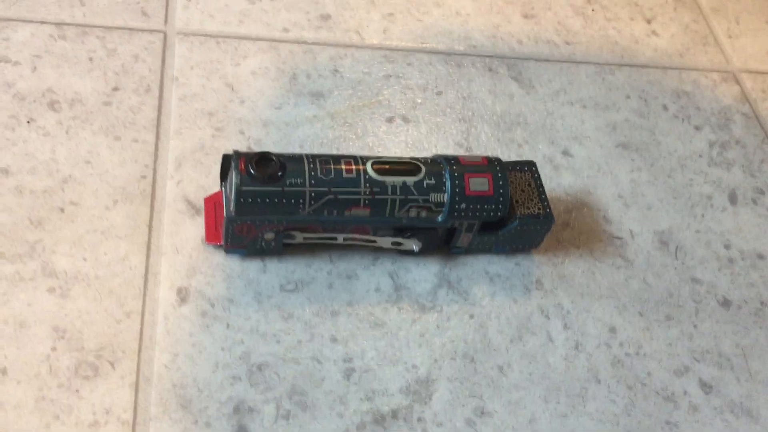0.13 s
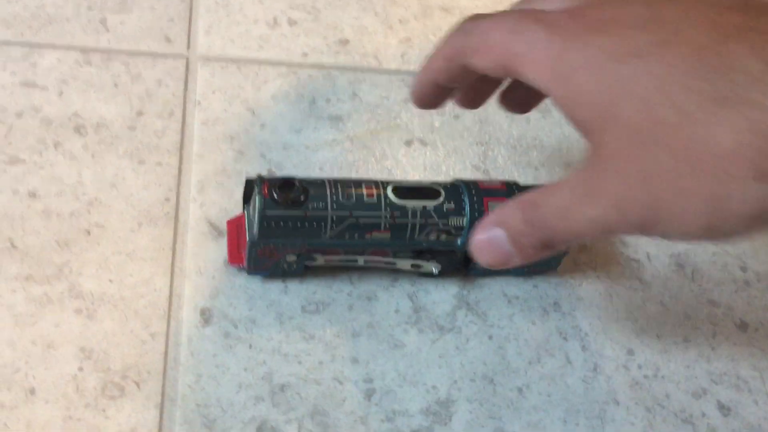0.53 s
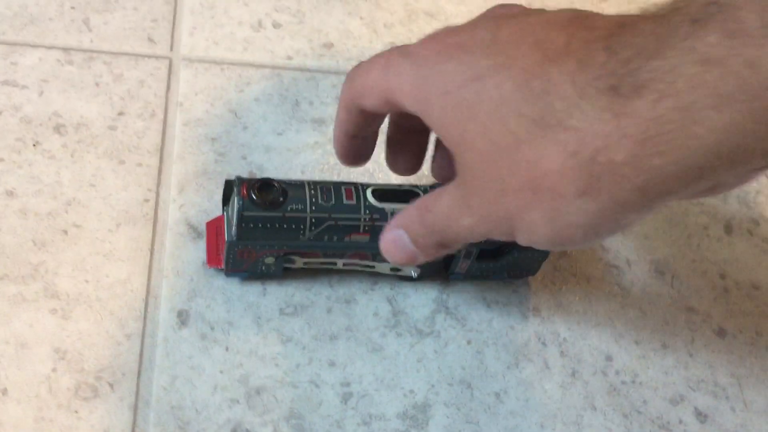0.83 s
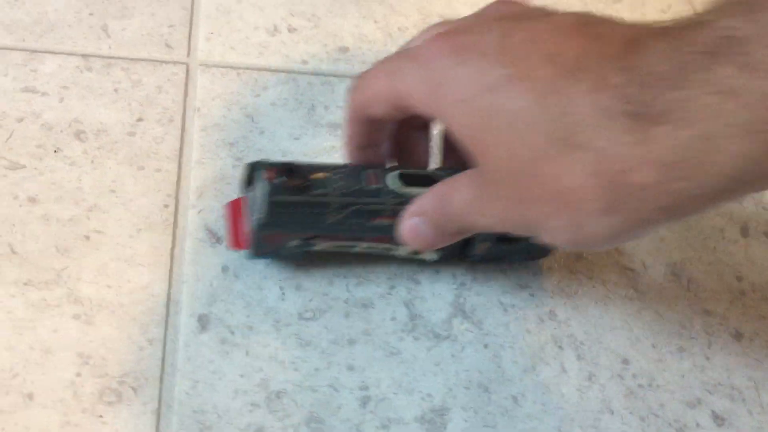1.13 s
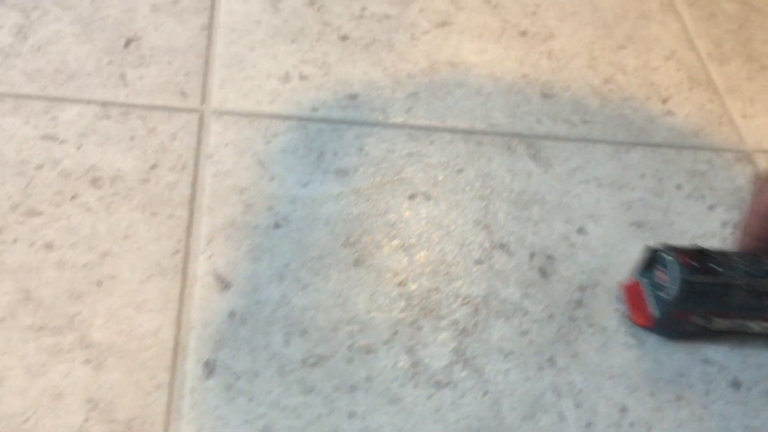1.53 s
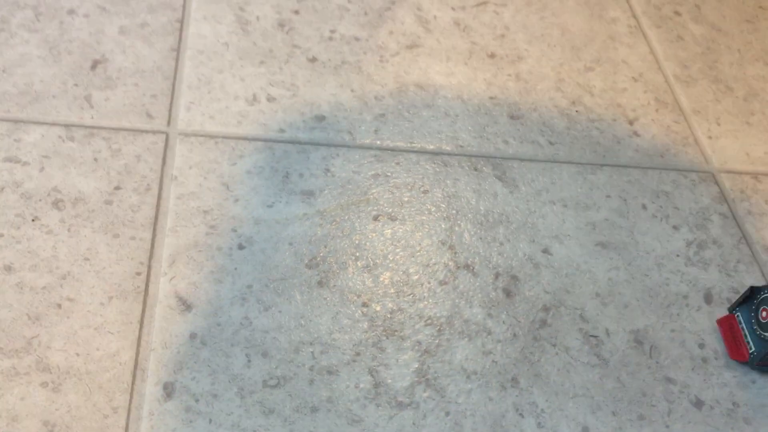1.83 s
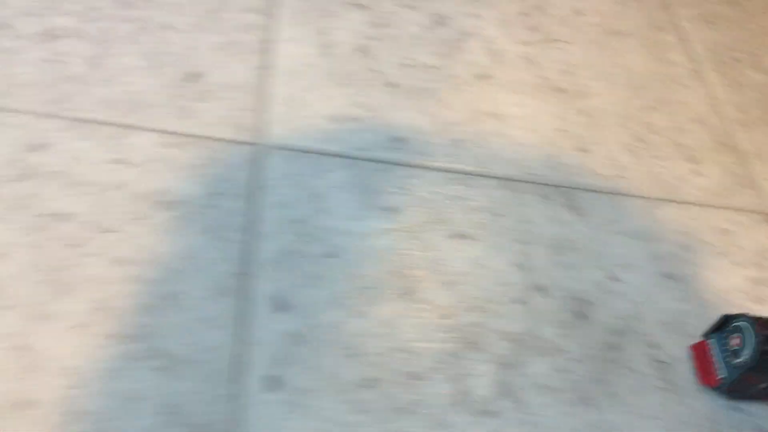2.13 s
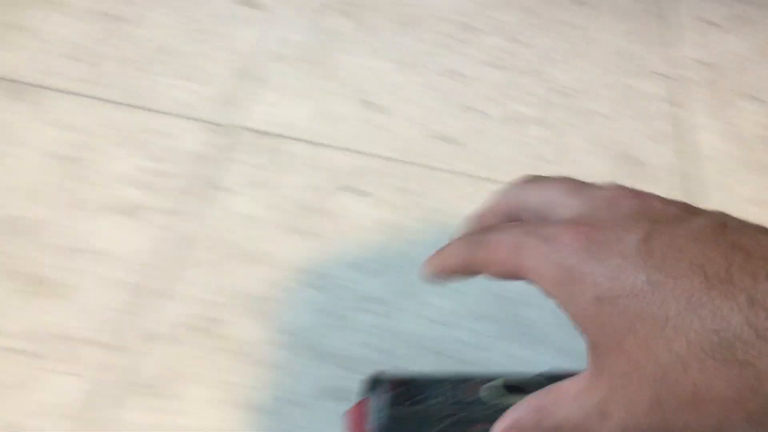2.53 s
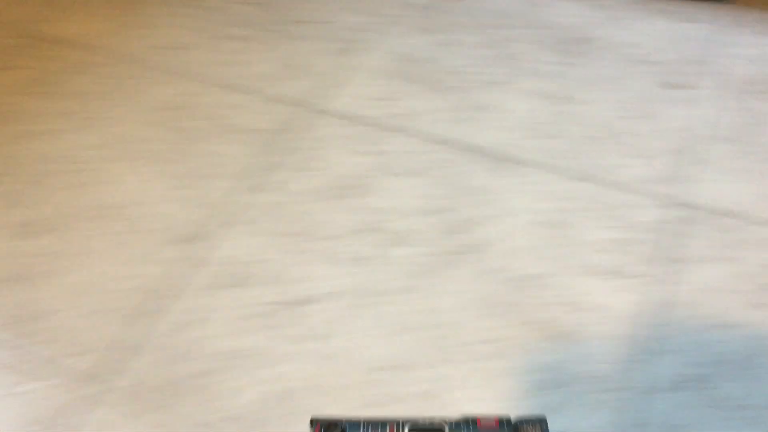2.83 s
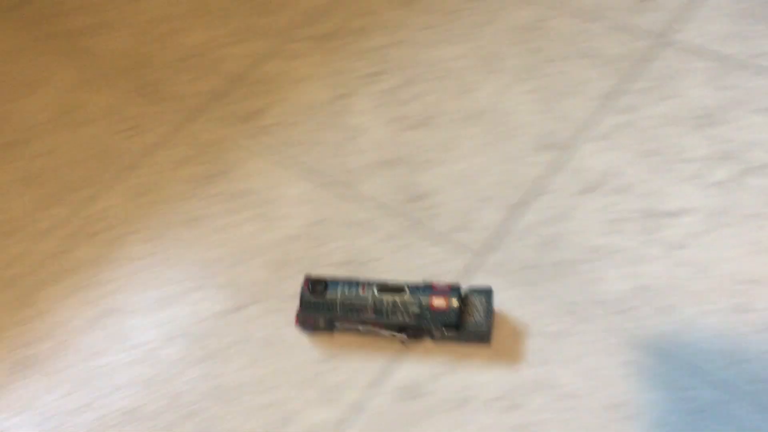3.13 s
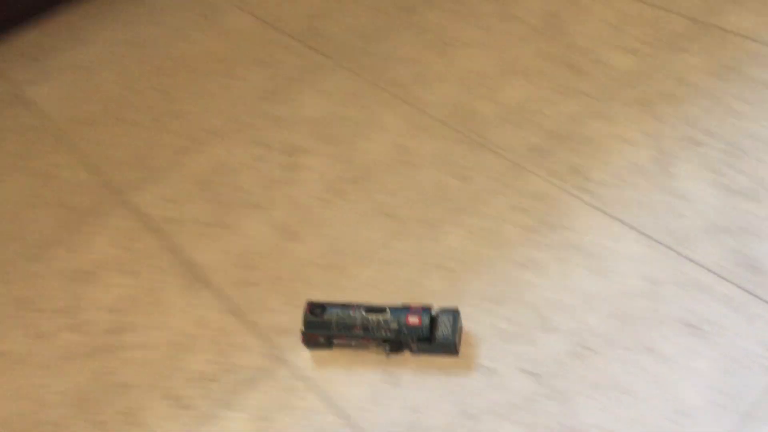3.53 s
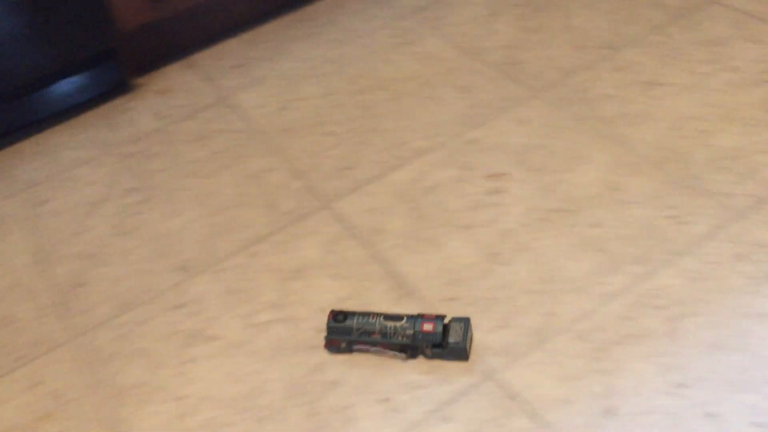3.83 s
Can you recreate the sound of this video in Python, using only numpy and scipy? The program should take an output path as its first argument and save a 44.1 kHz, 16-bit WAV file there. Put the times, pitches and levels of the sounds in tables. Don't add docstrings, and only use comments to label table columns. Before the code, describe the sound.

After a quiet second of low appliance drone, loose tin clicks and clatters under a hand; a hard push starts a harsh metallic gear whir that runs off along an indoor tiled floor, recorded close.

```python
import sys
import numpy as np
from scipy import signal
from scipy.io import wavfile
from scipy.ndimage import uniform_filter1d

SR = 44100
rng = np.random.default_rng(int(sys.argv[2]) if len(sys.argv) > 2 else 0)


def output_pcm(signal):
    pcm = np.clip(np.atleast_2d(signal).T, -1, 1) * 32767
    wavfile.write(sys.argv[1], SR, np.round(pcm).astype(np.int16))


def volts_from_decibels(level):
    exponent = np.asarray(level, float) / 20
    return 10 ** exponent


N = 176400
T = np.arange(N) / SR

# time in seconds, level in dB.
DRIVE = [(2.13, -54), (2.165, -37), (2.21, -30), (2.26, -25), (2.33, -21.5), (2.43, -21), (2.51, -22),
         (2.55, -22), (2.68, -23.5), (2.95, -24), (3.2, -25), (3.5, -26.5), (3.75, -27.5), (4.0, -28)]
# frequency in Hz, density in dB per Hz.
GRIND_HELD = [(500, -19), (900, -18), (1300, 4), (3300, 2.5), (4900, 0), (6200, 0.5), (8800, 4),
              (14000, -5)]
GRIND_FREE = [(500, 0), (800, -36), (1510, 6.5), (3900, 1), (4700, 1.5), (5900, 2.5), (9000, -1),
              (15400, -4.5)]
GRIND_FAR = [(500, 0), (800, -43), (1510, 5.5), (3900, -0.5), (4700, -6.5), (5900, 0), (9000, -2.5),
             (15400, -7)]
# frequency in Hz, width in
# Hz, levels held, just free and far off in dB.
TOY_MODES = [(950, 110, -13, -14, -16), (1425, 110, 5, 8, 3), (1530, 100, 6, 7, 7), (1740, 70, -3, 1, 3),
             (2130, 90, 1, 5, 6), (2440, 80, -7, -6, -2), (2750, 100, -2, 1, 2), (2990, 80, -8, -9, -4),
             (3200, 150, -4, -10, -10), (3454, 150, -7, -4, -5), (4050, 150, -4, -2, -4),
             (5330, 150, -5, -3, -7),
             (6010, 300, 1.5, -2, -2), (6550, 210, -2, -18, -11), (6970, 300, -3, -13, -2),
        (8550, 230, 0, -8, -5), (9800, 610, 3, 0.5, 2.5), (11280, 280, -9, -10, -9),
        (12900, 380, -1, -11, -10)]
# time in seconds, pitch in Hz, level in dB.
MESH = [(2.2, 480, -59), (2.3, 760, -68), (2.37, 950, -45), (2.41, 1082, -29), (2.45, 1210, -28.5),
        (2.49, 1340, -36), (2.55, 1436, -43), (2.9, 1480, -33.5)]
# time in seconds, peak in dB, brightness in dB, rattle t60 in seconds.
KNOCKS = [(0.8796, -50, -27, 0.045), (1.012, -36, -22, 0.11), (1.0773, -46, 3, 0.084),
          (1.1078, -34.5, -1.5, 0.046), (1.1184, -36, -5, 0.065), (1.1267, -33, -2, 0.071),
          (1.1466, -47, 11, 0.095), (1.1601, -21.5, -2.5, 0.038), (1.2005, -29.5, -11, 0.058),
          (1.698, -42, -24, 0.068), (1.708, -35, -5, 0.06), (1.714, -32, -0.5, 0.055),
          (1.7241, -25.5, -7, 0.071), (1.756, -39, 0.5, 0.077), (1.768, -29, -27, 0.054),
          (1.791, -38, -2, 0.055), (1.8167, -37, 5, 0.035), (1.8822, -26, -20, 0.076),
          (1.8875, -27, -15, 0.044), (1.8925, -20.5, -3.5, 0.061), (1.9044, -26, -8, 0.074),
          (1.9594, -32, -8, 0.067), (1.9815, -29, 1, 0.063), (2.002, -19.5, -3.5, 0.054),
          (2.0138, -31, 5.5, 0.044), (2.062, -40.5, 2, 0.093), (2.0942, -31, 0.5, 0.06),
          (2.1191, -35, 2, 0.029), (2.1341, -28, 1, 0.049), (2.156, -23, -18, 0.06)]
# frequency in Hz, level in dB, t60 in seconds.
KNOCK_MODES = [(1553, 3.5, 0.035), (2050, 0, 0.036), (2580, 0, 0.03), (3300, -15, 0.11),
               (6480, -17.5, 0.019), (8300, -26, .025), (11200, -15, 0.031)]
# frequency in Hz, density in dB per Hz.
KNOCK_TONE = [(470, -52), (800, -26), (1500, 5.5), (2660, 8.5), (4810, -0.5), (6480, 5.5), (15400, -1.5)]
# time in seconds, frequency in Hz, peak in dB.
RINGS = [(1.0116, 6150, -54), (1.0112, 4070, -54), (0.8793, 2090, -58), (1.109, 2000, -45),
         (1.109, 7900, -54), (1.1605, 2030, -38), (1.1605, 8700, -39), (1.2005, 3400, -46.5),
         (1.1999, 1550, -44), (1.2005, 5050, -51), (1.715, 2600, -37), (1.715, 3900, -44),
         (1.7257, 2250, -35), (1.7257, 3250, -37.5), (1.7567, 3250, -47), (1.792, 5850, -55),
         (1.817, 5100, -54), (1.8928, 6700, -35), (1.8941, 2500, -36), (1.9613, 2770, -48),
         (2.002, 2800, -35), (2.0011, 3650, -40), (2.0939, 3250, -41), (2.135, 2600, -39),
         (2.154, 3200, -38), (2.978, 2140, -34)]
# time in seconds, peak in dB, frequency in Hz.
TICKS = [(1.708, -44, 1590), (1.7208, -45, 1554), (1.736, -41, 1436), (1.7564, -45, 1595),
         (1.7674, -42, 1490), (1.7973, -48, 1340), (1.8114, -51, 1370), (1.8277, -46, 1305),
         (1.843, -44, 1480), (1.864, -52.5, 1520), (1.884, -50, 1500), (1.908, -47, 1610),
         (1.9244, -47, 1510), (1.955, -53, 1540), (1.9834, -47, 1470), (2.0418, -53, 1590),
         (2.0656, -56, 1520)]
# start in seconds, length in seconds, level in dB, loudest ring in Hz,
# upper rings in dB.
CREEP = [
    (1.04, 0.12, -58.5, 1970, -10),
    (1.684, 0.166, -58, 1420, 4),
    (1.84, 0.234, -63.5, 1540, 2),
]
# frequency in Hz, width in Hz, level in dB.
CREEP_LINES = [(2250, 55, -6), (2690, 81, -6), (3100, 58, -10), (3960, 50, -9), (5050, 45, -5)]
# frequency in Hz, density in dB per Hz.
CREEP_TONE = [(470, -47), (800, -37), (1520, 6), (2620, -9), (4520, -33), (6640, -20), (15400, -19)]
# time in seconds, frequency in Hz, length in seconds, level in dB.
THUDS = [
    (2.512, 231, 0.072, -45),
    (2.731, 960, 0.02, -41.5),
    (3.941, 300, 0.03, -47),
]
# time in seconds, level in dB.
RUMBLE = [(2.2, -47), (2.5, -53.5), (3.1, -46), (3.5, -51.5), (4.0, -51.5)]
# frequency in Hz, density in dB per Hz.
RUMBLE_TONE = [(30, -42), (70, 4.5), (119, -15), (162, 1.5), (300, -8), (430, -17.5)]
# time in seconds, peak in dB, ring in dB.
TAPS = [
    (0.719, -52, 1),
    (1.391, -51.5, -1.5),
]
# frequency in Hz, level in dB, t60 in seconds.
TAP_MODES = [(650, 16, 0.16), (960, 4, 0.12), (1420, 14.5, 0.091), (1870, 7, 0.076), (2680, -19, .04)]
# frequency in Hz, width in Hz, level in dB.
DRONE = [(54.3, 2, -61.5), (105.7, 4.1, -54), (161, 14.4, -59.5)]
# frequency in Hz, density in dB per Hz.
ROOM = [(15, -61), (25, -35), (110, -6.5), (132, -13), (169, -7.5), (348, -24.5), (388, -34.5), (1050, -30),
        (15400, -52.5)]


def rms_one(x):
    return x / np.sqrt(np.mean(x ** 2) + 1e-20)


def in_time(rows):
    s, *columns = np.transpose(rows)
    return [np.interp(T, s, c) for c in columns]


def at_hz(points, hz):
    points_hz, points_db = np.transpose(points)
    return np.interp(np.log(hz), np.log(points_hz), points_db, left=-70)


def drift(rate_hz):
    r = np.exp(-80 * np.pi * rate_hz / SR)
    slow = signal.lfilter([1], [1, -2 * r, r * r], rng.standard_normal(N // 40 + 2002))[2000:]
    return np.interp(np.arange(N) / 40, np.arange(len(slow)), rms_one(slow))


def resonate(x, hz, width_hz):
    r = np.exp(-np.pi * width_hz / SR)
    poles = [1, -2 * r * np.cos(2 * np.pi * hz / SR), r * r]
    return signal.lfilter([(1 - r * r) / 2, 0, (r * r - 1) / 2], poles, x)


def filtered(x, order, hz, kind):
    return signal.sosfilt(signal.butter(order, hz, kind, fs=SR, output="sos"), x)


def coloured(source, level_db, patchy_db, rate_hz):
    edges_hz = 25 * 2 ** (np.arange(30) / 3)
    out = np.zeros(N)
    for k, (a, b) in enumerate(zip(edges_hz, edges_hz[1:])):
        band_db = level_db(np.sqrt(a * b))
        if np.max(band_db) > -60:
            band = signal.sosfilt(signal.butter(2, [a, b], "band", fs=SR, output="sos"), source[k % 2])
            out += volts_from_decibels(band_db + patchy_db * drift(rate_hz)) * band
    return rms_one(out)


def grains(rate_per_s, spread_db):
    size = volts_from_decibels(spread_db * np.minimum(rng.exponential(1, (2, N)), 5)) * rng.choice([-1, 1], (2, N))
    return rms_one(size * (rng.random((2, N)) < rate_per_s / SR) + 1e-9)


def struck(s, db, modes, spread_db):
    out = np.zeros(N)
    luck = rng.standard_normal((len(s), len(modes)))
    for k, (hz, mode_db, t60_s) in enumerate(modes):
        clicks = np.full(N, 1e-18)
        clicks[(np.array(s) * SR).astype(int)] = volts_from_decibels(db + mode_db + spread_db * luck[:, k])
        r = volts_from_decibels(-60 / (min(t60_s, .07) * SR))
        w = 2 * np.pi * hz / SR
        out += signal.lfilter([0, np.sin(w)], [1, -2 * r * np.cos(w), r * r], clicks)
    return out


def gears():
    release_s, release_fade_s = 2.52, 0.041
    turn_s, turn_length_s = 2.7, 0.93
    wobble_hz, sag_hz_per_s, wobble_db = 45.53, 6, 0.87
    free = np.clip((T - release_s) / release_fade_s + .5, 0, 1)
    far = np.clip((T - turn_s) / turn_length_s, 0, 1)

    def blend(held_db, free_db, far_db):
        return held_db * (1 - free) + free_db * (free - far) + far_db * far

    def grind_db(hz):
        return blend(at_hz(GRIND_HELD, hz), at_hz(GRIND_FREE, hz), at_hz(GRIND_FAR, hz))

    teeth = grains(rate_per_s=9000, spread_db=2.5)
    grind = coloured(teeth, grind_db, patchy_db=2, rate_hz=40)
    shell = np.zeros(N)
    for k, (hz, width_hz, *levels_db) in enumerate(TOY_MODES):
        flicker_db = 1.3 * drift(22) + 1.6 * drift(5)
        shell += (-1) ** k * volts_from_decibels(blend(*levels_db) + flicker_db) * resonate(teeth[k % 2], hz, width_hz)
    body = filtered(grind + rms_one(shell), 2, 850, "high")
    body = body + 1.3 * resonate(body, 12950, 350) * np.exp(-((T - 3.05) / .16) ** 2)
    body = body / np.sqrt(uniform_filter1d(body ** 2, size=8000))

    turns = np.cumsum(wobble_hz - sag_hz_per_s * (T - release_s) + 3.26 * drift(2.5)) / SR
    shake_db = wobble_db * np.sin(2 * np.pi * turns) + 0.81 * drift(29)
    level_db, = in_time(DRIVE)
    body = body * volts_from_decibels(level_db + shake_db + 0.5) * (T > 2.13)

    mesh_hz, mesh_db = in_time(MESH)
    whine = np.sin(2 * np.pi * np.cumsum(mesh_hz + 15 * drift(34)) / SR)
    whine = whine * volts_from_decibels(mesh_db + 2 * drift(30)) * (T > 2.2) * (T < 2.9)
    squeak = volts_from_decibels(-27) * np.exp(-.5 * ((T - 2.417) / .007) ** 2) * np.sin(2 * np.pi * 2185 * T)
    return body + whine + squeak


def knocks():
    attack_s, ring_db, split_hz = 0.0004, -24, 4700
    s, db, bright_db, t60_s = np.transpose(KNOCKS)
    noise = coloured(grains(14000, 1.2), lambda hz: at_hz(KNOCK_TONE, hz), patchy_db=2.5, rate_hz=16)
    ringing = sum(volts_from_decibels(mode_db) * resonate(noise, hz, 200) for hz, mode_db, _ in KNOCK_MODES)
    noise = .5 * noise + rms_one(ringing)
    low = rms_one(filtered(noise, 4, split_hz, "low"))
    high = rms_one(filtered(noise, 4, split_hz, "high"))
    after_s = T - s[:, None]
    fall = volts_from_decibels(db[:, None] - 60 * np.abs(after_s) / t60_s[:, None])
    fall = fall * np.clip(after_s / attack_s, 0, 1)
    dull = np.sqrt((fall ** 2).sum(0))
    bright = np.sqrt(volts_from_decibels(2 * bright_db) @ fall ** 2)
    rattle = volts_from_decibels(-18) * dull * low + volts_from_decibels(-12.5) * bright * high
    low_modes = struck(s, db + ring_db, KNOCK_MODES[:4], spread_db=4.5)
    high_modes = struck(s, db + bright_db + ring_db, KNOCK_MODES[4:], spread_db=6)
    return rattle + low_modes + high_modes


def rings():
    parts = [(s, hz, db, 0.053 * (2000 / hz) ** 0.48) for s, hz, db in RINGS]
    ticks = [(s, hz, db - 2, .07) for s, db, hz in TICKS]
    out = np.zeros(N + 6000)
    t = T[:6000]
    for s, hz, db, t60_s in parts + ticks:
        start = int(s * SR)
        decay = volts_from_decibels(db - 60 * t / t60_s) * np.clip(t / .001, 0, 1)
        out[start:start + len(t)] += decay * np.sin(2 * np.pi * hz * t)
    return out[:N]


def creep():
    fade_s, ring_db = 0.027, 3
    touches = grains(5500, 4.3)
    lines = sum(volts_from_decibels(db + 3.5 * drift(25)) * resonate(touches[1], hz, w) for hz, w, db in CREEP_LINES)
    rustle = coloured(touches, lambda hz: at_hz(CREEP_TONE, hz), patchy_db=6, rate_hz=26)
    out = np.zeros(N)
    for s, length_s, db, hz, upper_db in CREEP:
        gate = np.clip(np.minimum(T - s, s + length_s - T) / fade_s, 0, 1)
        ring = rms_one(volts_from_decibels(upper_db) * lines + resonate(touches[0], hz, 90))
        out += volts_from_decibels(db) * gate * (rustle + volts_from_decibels(ring_db) * ring)
    return volts_from_decibels(1.3 * drift(30)) * out


def hall(x):
    bounce_s, bounce_gain, t60_s, tail_db = 0.0003315, 0.39, 0.28, -14.5
    band = signal.butter(1, [4100, 10700], "band", fs=SR)
    bounce = signal.lfilter(*band, np.interp(T - bounce_s, T, x))
    t = T[:SR // 2]
    tail = rng.standard_normal(SR // 2) * volts_from_decibels(-60 * t / t60_s) * (t > .006)
    tail = signal.lfilter([1], [1, -.6], tail)
    diffuse = signal.fftconvolve(x, tail / np.linalg.norm(tail))[:N]
    return (x + bounce_gain * bounce) / np.hypot(1, bounce_gain) + volts_from_decibels(tail_db) * diffuse


def hum(hz, width_hz):
    return rms_one(resonate(rng.standard_normal(N), hz, width_hz))


def low_rumble():
    def tone_db(hz):
        return at_hz(RUMBLE_TONE, hz) - 50 * (hz > 450)

    level_db, = in_time(RUMBLE)
    rumble = coloured(rng.standard_normal((2, N)), tone_db, patchy_db=3, rate_hz=4.8)
    rumble = rumble * volts_from_decibels(level_db + 1) * np.clip((T - 2.2) / 0.15, 0, 1)
    thuds = sum(volts_from_decibels(db) * np.exp(-((T - s) / length_s) ** 2) * hum(hz, 28) for s, hz, length_s, db in THUDS)
    return rumble + thuds


def distant_sounds():
    s, db, ring_db = np.transpose(TAPS)
    after_s = T - s[:, None]
    puff = ((after_s > 0) * volts_from_decibels(db[:, None] - 12 - 60 * np.abs(after_s) / .09)).sum(0)
    puff = puff * hum(1100, 1100)
    squeak = np.sin(2 * np.pi * np.cumsum(3440 + 15 * drift(30)) / SR)
    squeak = squeak * volts_from_decibels(-75.5 + 2.8 * drift(20)) * np.exp(-((T - .795) / .07) ** 4)
    return puff + squeak + struck(s, db + ring_db - 17, TAP_MODES, spread_db=1.5)


def room():
    noise = rng.standard_normal((2, N))
    air = volts_from_decibels(-59) * coloured(noise, lambda hz: at_hz(ROOM, hz), patchy_db=2.5, rate_hz=15)
    drone = sum(volts_from_decibels(db) * hum(hz, width_hz) for hz, width_hz, db in DRONE)
    return air + drone * volts_from_decibels(-3.5 * np.clip((T - 2.33) / 0.031, 0, 1))


def scene():
    handled = filtered(knocks() + rings() + creep(), 4, 1130, "high")
    toy = hall(gears() + handled)
    toy = toy - resonate(toy, 10520, 600) * np.exp(-((T - 2.33) / .12) ** 4)
    mono = toy + low_rumble() + distant_sounds() + room()
    return np.array([mono, mono])


def low_pass(x):
    return signal.sosfilt(signal.butter(12, 16970, fs=SR, output="sos"), x)


def record(dry):
    start_s, fade_s, cutoff_hz = .084, 0.0026, 15740
    limited = .6 * np.tanh(dry / .6)
    cut = signal.sosfilt(signal.ellip(12, .5, 70, cutoff_hz, fs=SR, output="sos"), limited)
    cut = cut + 0.57 * resonate(cut, 15800, 1300)
    mix = cut * np.clip((T - start_s) / fade_s, 0, 1)
    return low_pass(mix)


dry = scene()
out = record(dry)
output_pcm(out)
```